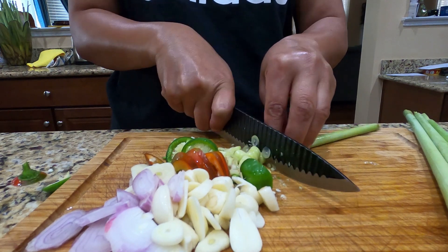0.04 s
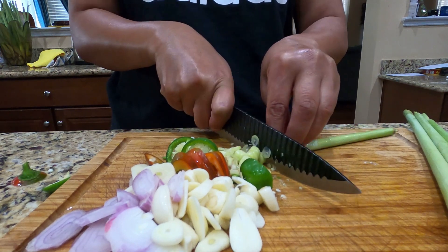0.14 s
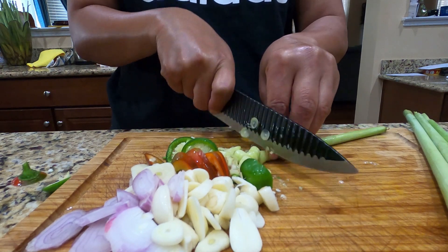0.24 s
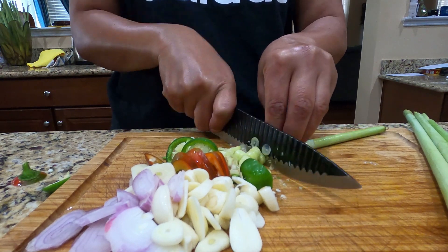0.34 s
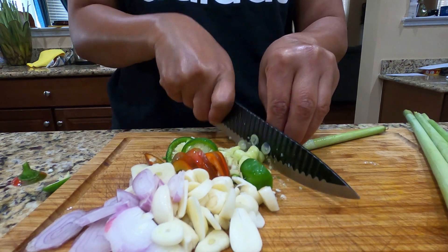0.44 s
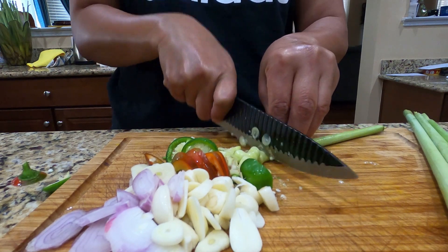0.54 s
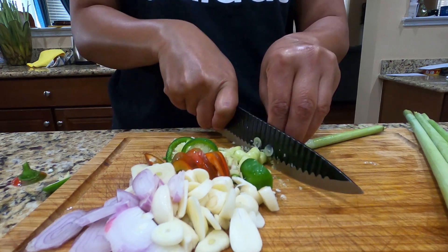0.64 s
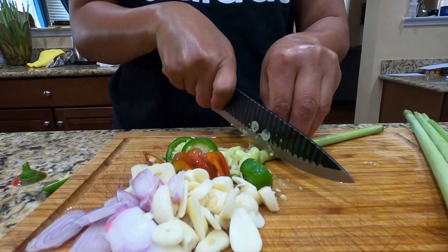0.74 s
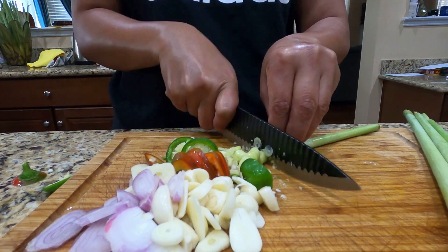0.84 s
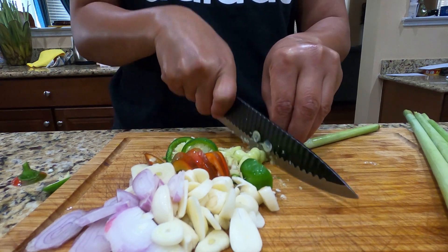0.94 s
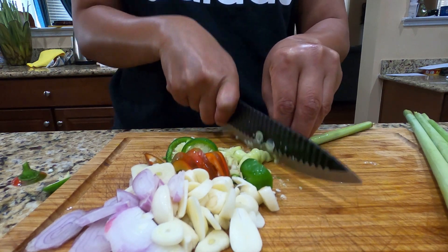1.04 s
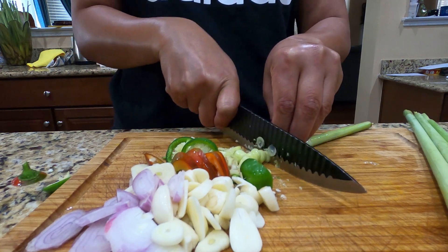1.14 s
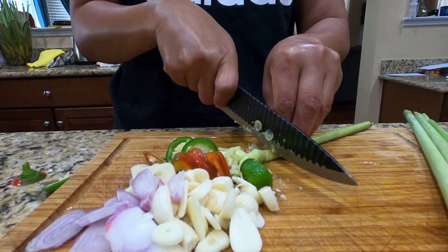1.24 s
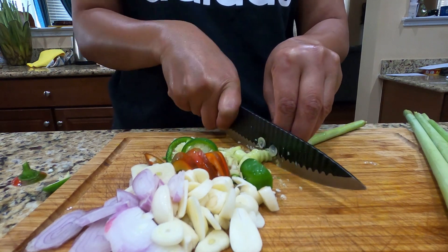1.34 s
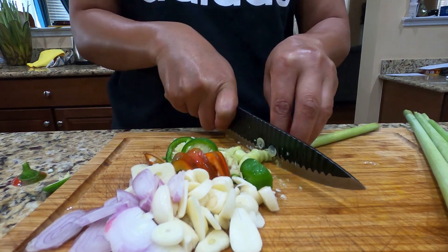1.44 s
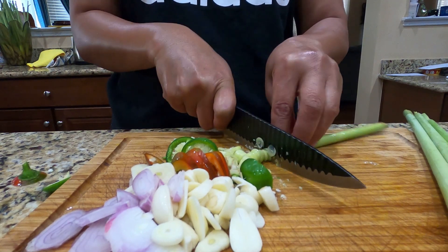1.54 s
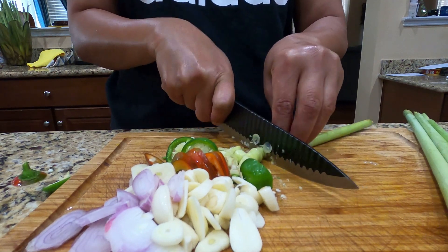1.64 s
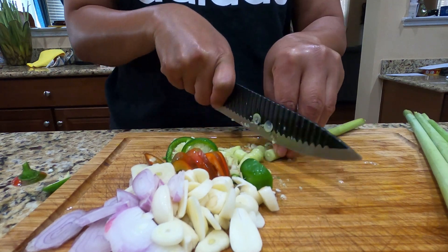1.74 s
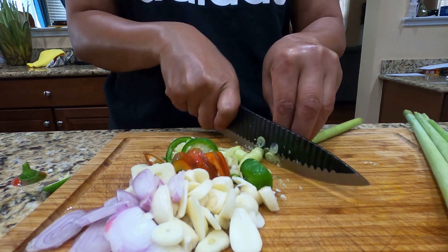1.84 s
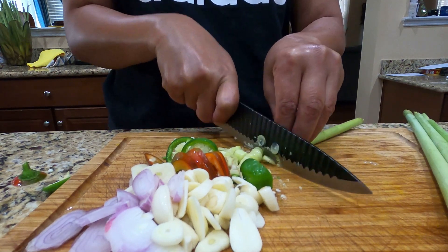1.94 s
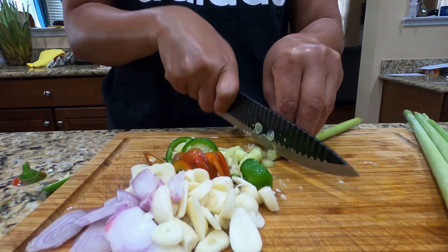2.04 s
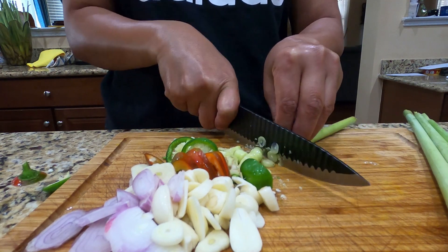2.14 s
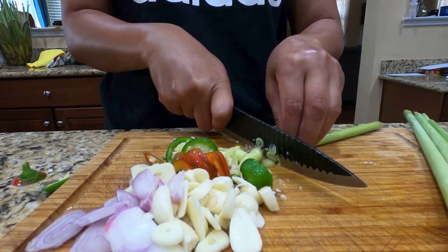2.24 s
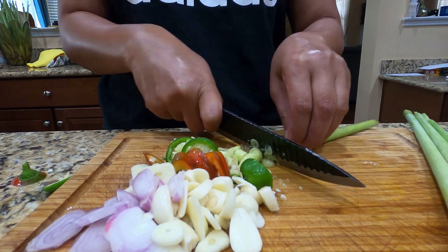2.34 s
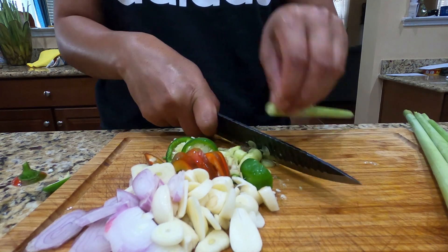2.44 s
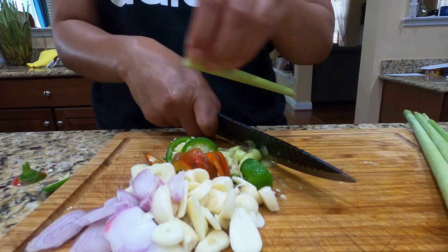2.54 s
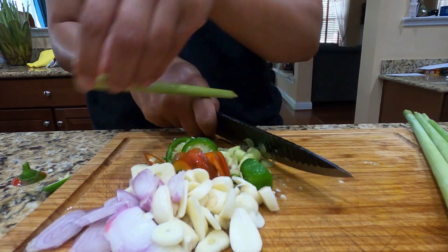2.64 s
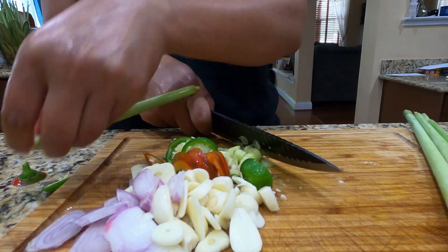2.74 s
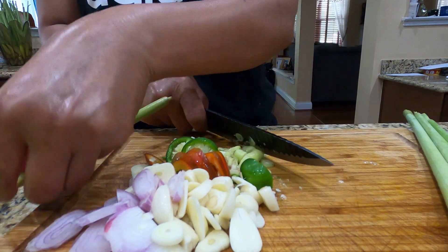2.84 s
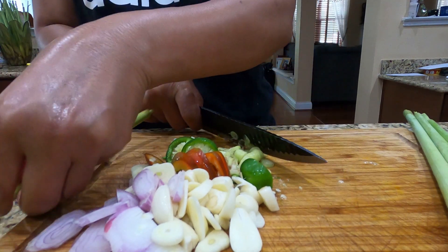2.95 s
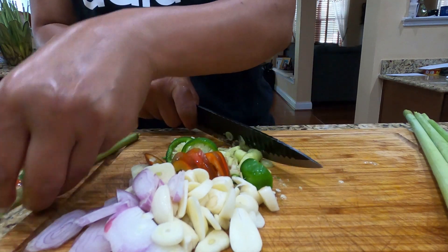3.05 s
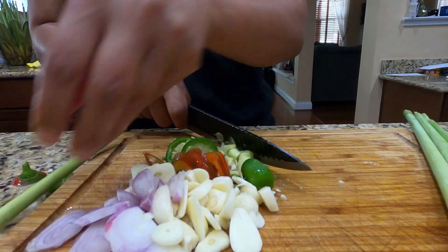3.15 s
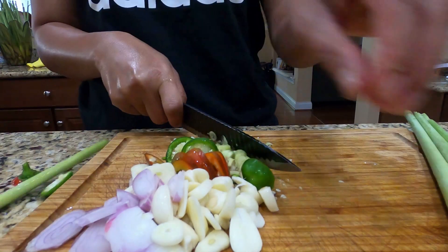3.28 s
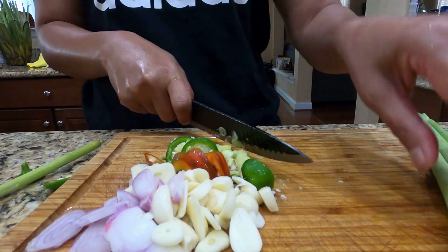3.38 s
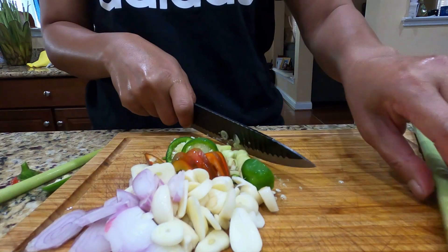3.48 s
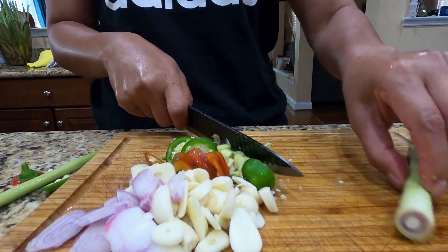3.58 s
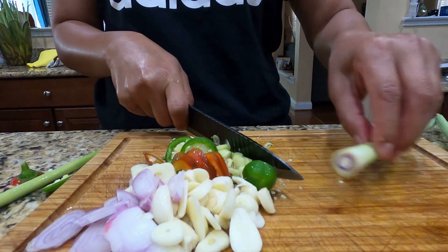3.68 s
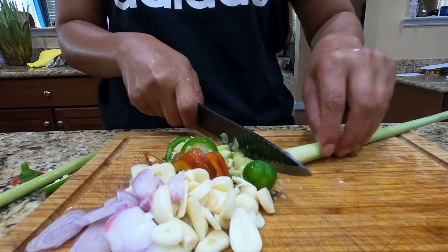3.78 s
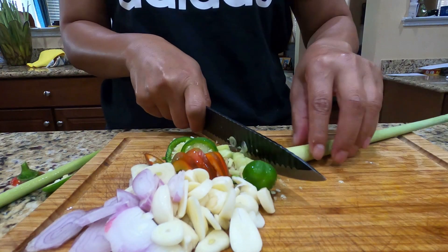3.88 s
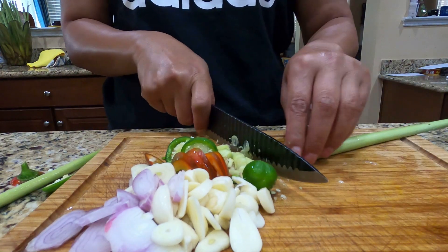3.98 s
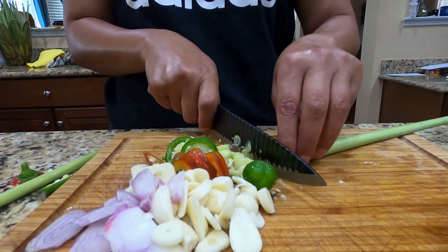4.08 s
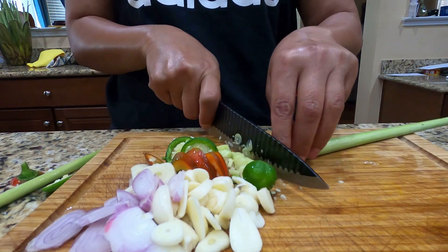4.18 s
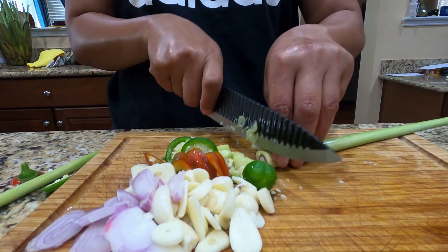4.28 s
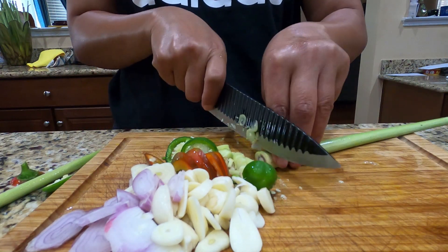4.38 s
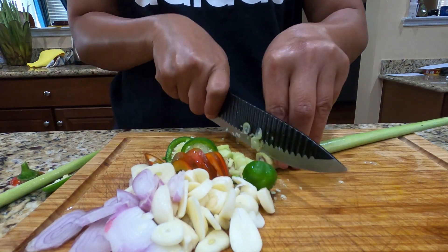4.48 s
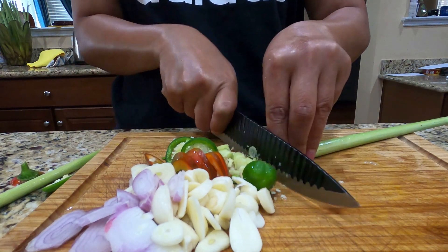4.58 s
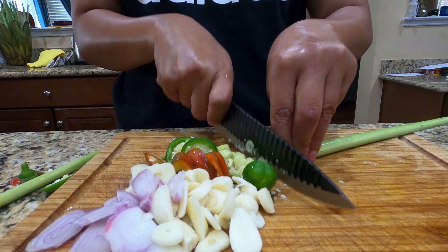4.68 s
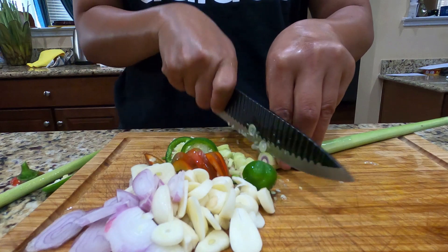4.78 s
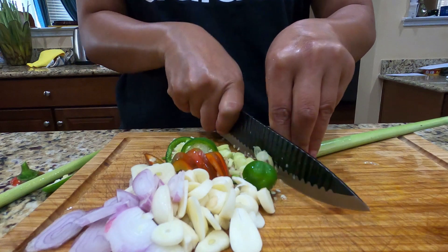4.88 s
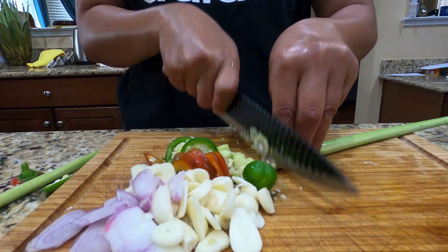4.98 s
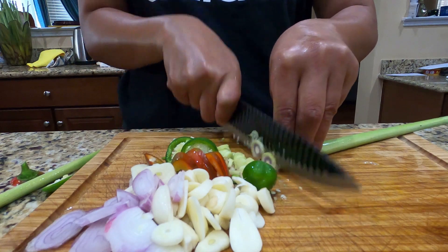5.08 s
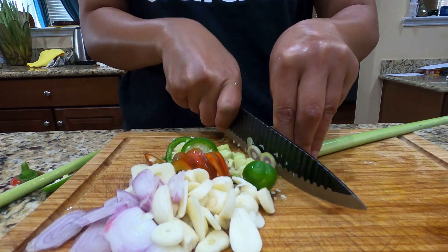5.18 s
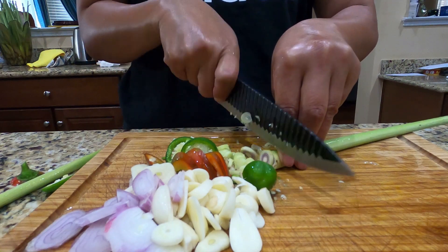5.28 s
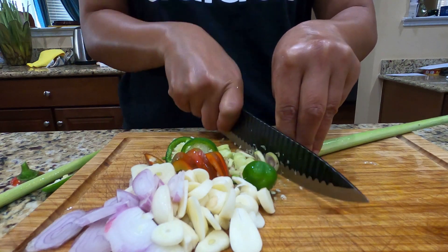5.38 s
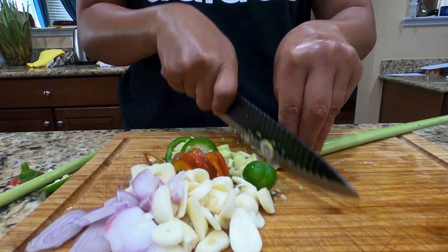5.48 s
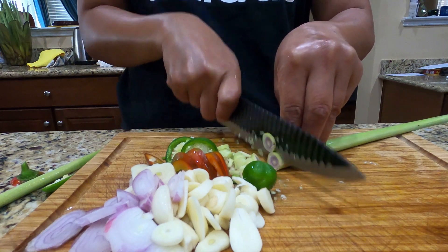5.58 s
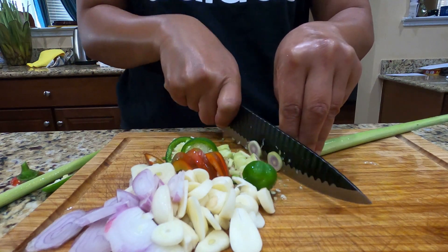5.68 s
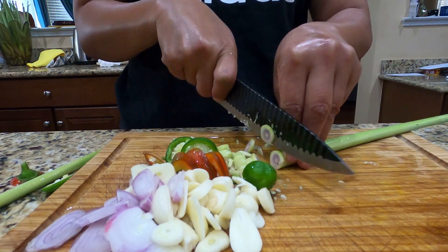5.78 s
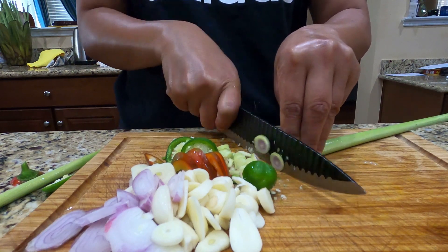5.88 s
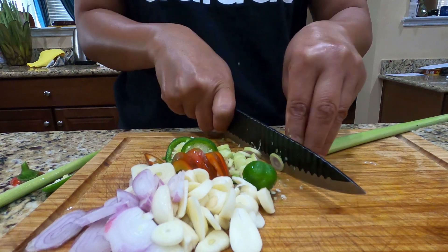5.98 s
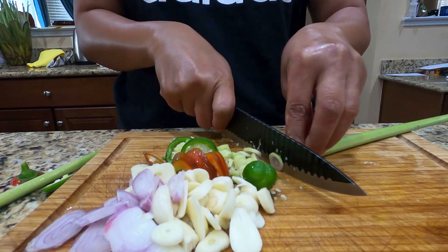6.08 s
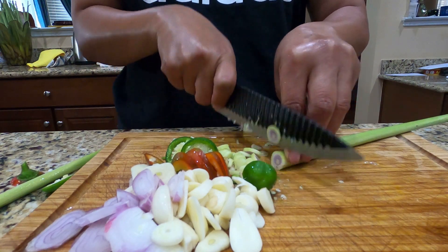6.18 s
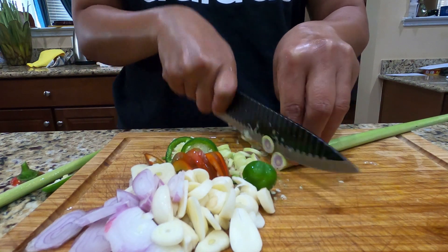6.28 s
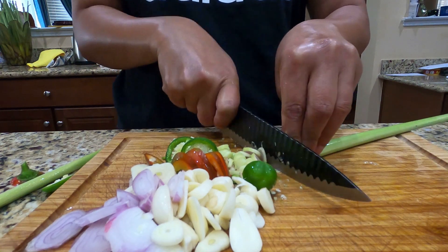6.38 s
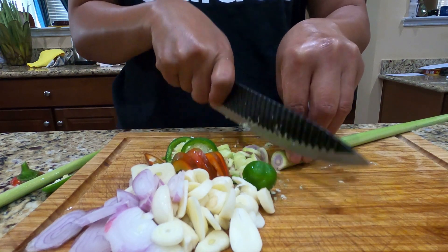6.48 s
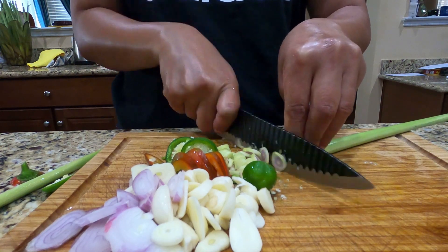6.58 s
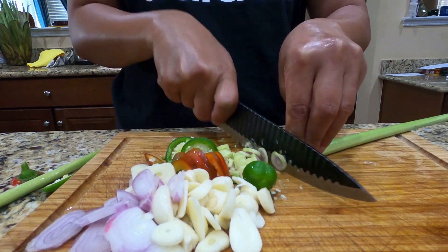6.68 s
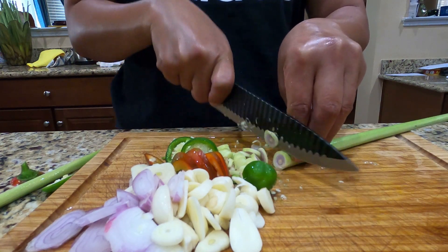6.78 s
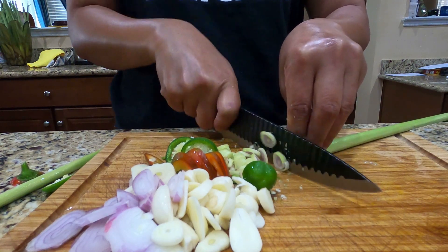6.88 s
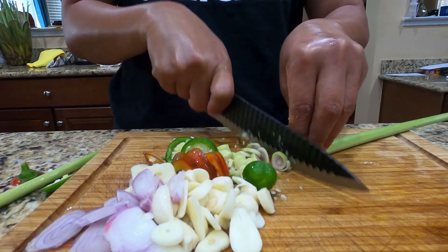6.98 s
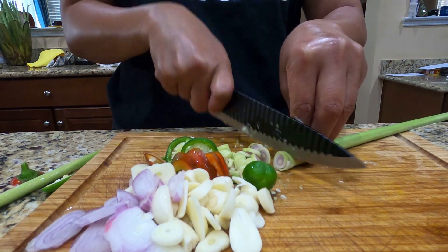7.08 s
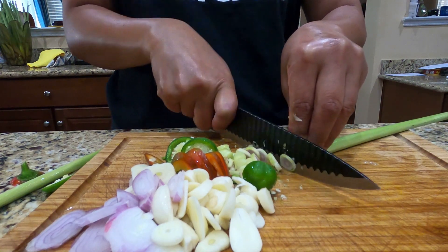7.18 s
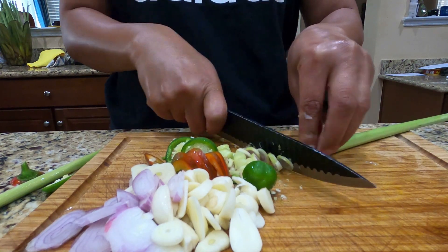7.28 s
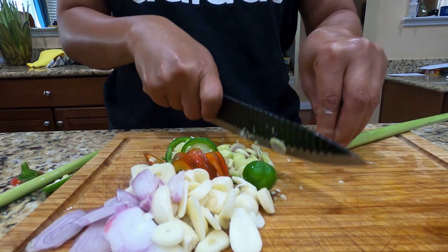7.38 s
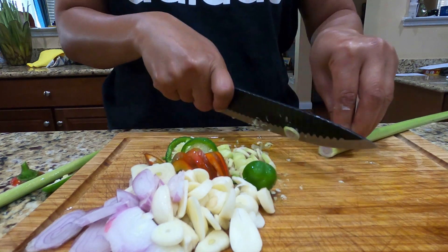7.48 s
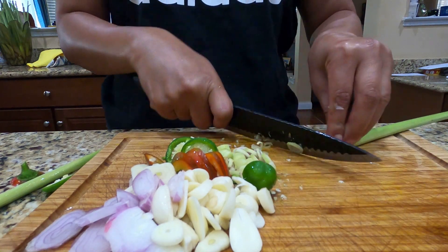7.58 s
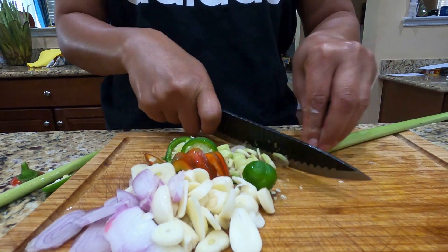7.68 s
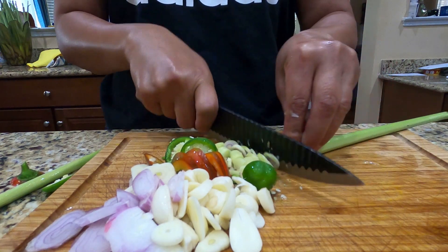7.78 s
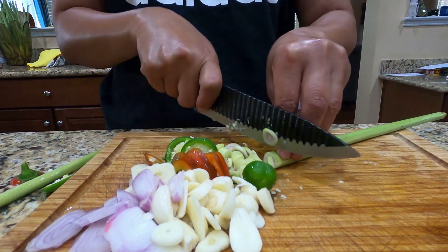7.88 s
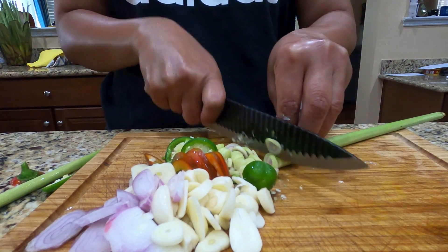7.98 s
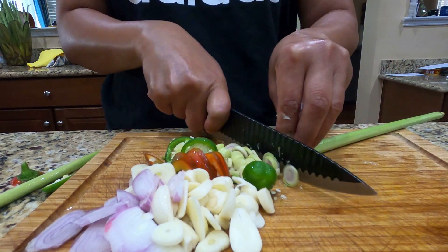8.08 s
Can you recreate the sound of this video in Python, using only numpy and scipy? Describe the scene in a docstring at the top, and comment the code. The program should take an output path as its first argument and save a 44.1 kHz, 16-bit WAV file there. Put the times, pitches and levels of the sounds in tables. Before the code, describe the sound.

A close stereo microphone hears a chef's knife slicing fibrous stalks on a wooden board in a reflective home kitchen, with faint room air and a low, slightly wavering motor hum throughout. From 0 to 2.3 s come eight cuts, about one every quarter second with one longer gap before 1.9: a skin tick, a short swelling crunch, then a dry woody knock. The one at 0.45 is far louder, with a bright blade clack. Between close cuts the lifting blade wipes softly. From 2.8 to 4.2 only handling: faint slides, light taps from 3.15 to 3.6, a duller thud near 4.0. At 4.7 the hardest chop cracks out, followed by regular cuts from 5.0 to 7.3, another loud clacking blow at 6.45. A firm tap at 7.7 and a brief edge scrape over wood at 7.75 lead to a last soft crunch and knock at 8.1.

```python
"""A chef's knife slices lemongrass on a wooden board on a stone counter, near the microphone in a live kitchen.
Each cut in turn: a tick of skin and a swelling crunch of fibres (filtered grains), then a knock (board modes).
Between close cuts the lifting blade wipes the cut face. Midway a new stalk is fetched: taps, slides, thuds.
Slicing resumes; before the last cut the edge drags over the wood (filtered grains). A motor hum (a sine)
and room air (filtered noise) last throughout; a limiter ducks after the hardest blows, which also clack."""
import sys
import numpy as np
from scipy import signal
from scipy.fft import rfft, irfft, next_fast_len
from scipy.io import wavfile
from scipy.ndimage import uniform_filter1d, minimum_filter1d

SR = 44100
rng = np.random.default_rng(int(sys.argv[2]) if len(sys.argv) > 2 else 0)


def master_out(mix):
    """Clip the mix to full scale and print it as 16-bit PCM to the path in sys.argv[1]."""
    frames = np.transpose(np.atleast_2d(mix))
    ceiling = np.clip(frames, -1, 1)
    pcm = np.round(ceiling * 32767).astype(np.int16)
    wavfile.write(sys.argv[1], SR, pcm)


N = 358533
TIME = np.arange(N) / SR

# Cuts: edge touches stalk t/s, edge reaches board t/s, skin pop level/dB, crunch level/dB, knock level/dB
CUT_EVENTS = [(0.013, 0.0729, -32, -24, -2), (0.44, 0.464, -16.5, -36, 9.5),
              (0.677, 0.728, -13, -23.5, -11), (0.92, 0.9646, -40, -23.5, -6.5),
              (1.157, 1.2146, -25, -21, -14), (1.425, 1.4707, -18.5, -20, -6.5),
              (1.9362, 1.9808, -19, -19.5, -11.5), (2.195, 2.2413, -29.5, -20, -10),
              (4.585, 4.689, -17.5, -23.5, 13.5), (4.923, 4.9921, -17, -22.5, -9),
              (5.194, 5.2547, -11.5, -22, -7.5), (5.451, 5.5006, -14, -22, -2),
              (5.689, 5.7536, -18.5, -22.5, -2.5), (5.957, 6.0147, -21, -23.5, -2.5),
              (6.42, 6.4593, -12.5, -24.5, 13), (6.676, 6.7299, -9, -24, -7.5),
              (6.932, 7.011, -20.5, -23, -13), (7.206, 7.265, -24.5, -24.5, -1.5),
              (8.09, 8.151, -17.5, -25.5, -14)]
# Stalks and blade set down on the board: t/s, peak level/dB, lowest f/Hz, highest f/Hz
SET_DOWN_TAPS = [(3.1601, -19.5, 1570, 2940), (3.362, -29, 950, 1970), (3.4504, -26, 690, 10800),
                 (3.571, -37.5, 60, 7300), (3.951, -40.5, 60, 1090), (3.9841, -17, 40, 1600),
                 (4.167, -52, 100, 3670), (4.56, -44, 100, 3600), (4.598, -24, 60, 1030),
                 (7.6957, -11.5, 102, 1420)]
# Modes of the board: f/Hz, relative level/dB, decay time T60/s
BOARD_MODES = [(56.9, -25.5, 0.17), (71, -26.5, 0.1), (127.4, -23.5, 0.1), (187, -30, 0.092),
               (218.6, -39, 0.27), (264, -35.5, 0.17), (450, -43, 0.3), (610, -36.5, .09),
               (800, -29.5, 0.13), (942, -35, 0.018), (1121.5, -15, 0.055), (1180, -28, 0.26),
               (1268, -30, 0.4), (1422, -32.5, 0.1), (1692, -14, 0.015), (1870, -26, 0.0064),
               (2520, -16.5, 0.0033)]
# Spectrum of the crack of a knock: f/Hz, relative level/dB
KNOCK_SPECTRUM = [(60, -14.5), (230, -16.5), (370, -13.5), (540, -7.5), (1050, -3), (1400, -0.5),
                  (2600, -5.5), (3400, -5), (5000, -14), (9000, -21), (16000, -33.5)]
# The blade's clack when it strikes the board hard: f/Hz, relative level/dB, decay time T60/s
CLACK_MODES = [(2430, -13.5, 0.024), (2793, -1, 0.014)]
# Thud of a stalk's thick end when set down: f/Hz, relative level/dB, decay time T60/s
THUD_MODES = [(293, -18.5, 0.039), (462, -13, 0.043), (574, -8, 0.084), (740, -8, 0.028), (944, -16, 0.053)]
# Modes of the blade, damped by the hand: f/Hz, relative level/dB, decay time T60/s
BLADE_MODES = [(3180, -41.5, 0.006), (3980, -34.5, 0.016), (4987, -48, 0.011), (9700, -54.5, 0.027)]
# Spectrum of the popping skin: f/Hz, relative level/dB
SKIN_SPECTRUM = [(60, 9.5), (150, 3), (330, -14), (700, -7), (1200, 2), (1800, 1), (2400, -13),
                 (3900, -6.5), (6500, -21), (10000, -21), (16000, -46.5)]
# Spectrum of the crunching fibres: f/Hz, relative level/dB
FIBRE_SPECTRUM = [(40, -8), (150, -5.5), (330, -25), (600, -9), (1100, -3), (1700, -2.5), (2450, -12.5),
                  (3000, -7.5), (3900, -6.5), (5200, -11.5), (6600, -22), (9700, -18), (13000, -27.5),
                  (16000, -42)]
# Spectrum of the blade wiping the cut face: f/Hz, relative level/dB
WIPE_SPECTRUM = [(200, -37), (900, -13), (2000, 2), (3300, 0), (5200, -9.5), (7000, -17), (10000, -17),
                 (16000, -35)]
# Hand moves that slide a stalk and lean on the board, plus the blade's last brief wipe at 7.45 s: start t/s,
# length t/s, slide level/dB, lean level/dB
HAND_MOVES = [(2.79, 0.28, -77, -93), (3.173, 0.15, -52, -59), (3.459, 0.0045, -53, -66),
              (3.568, 0.074, -52.5, -50), (3.646, 0.043, -45, -66), (3.762, 0.26, -64.5, -53),
              (4.13, 0.026, -61.5, -55.5), (4.21, 0.055, -75.5, -53), (4.333, 0.047, -56, -60),
              (4.583, 0.042, -45.5, -32.5), (7.452, 0.0039, -49.5, -65)]
# Spectrum of sliding stalks: f/Hz, relative level/dB
SLIDE_SPECTRUM = [(180, -55), (300, 0.5), (392, -3), (634, -6), (801, -9.5), (1100, -11), (2400, -7),
                  (3640, -7.5), (4590, -13), (5610, -18), (12100, -27), (16000, -58)]
# Hollow ring of the stalks: f/Hz, relative level/dB, decay time T60/s
STALK_MODES = [(574, -43, 0.067), (2350, -59, 0.018), (3820, -40, 0.024), (5690, -31.5, .03),
               (8620, -39, .04)]
# Spectrum of the edge dragged over wood: f/Hz, relative level/dB
SCRAPE_SPECTRUM = [(150, -22), (250, -16), (390, 0.5), (651, -15), (788, -0.5), (860, -8), (1700, -7),
                   (1980, -10.5), (3060, -3.5), (4730, -13.5), (6360, -28), (10400, -25.5), (13900, -48),
                   (16000, -76)]
# Right port against left: f/Hz, level difference/dB
PORT_TILT = [(60, 0), (130, -1.5), (400, 1.1), (800, 2.8), (1300, 4), (2400, -1.5), (4400, 3), (8000, 6),
             (15000, 10)]
# Scatter from things near the board: f/Hz, level/dB
CLUTTER_SPECTRUM = [(100, -16.5), (500, -11.5), (1500, -12), (4000, -3.5), (8000, -1.5), (15000, -2)]
# Reverberation of the kitchen: f/Hz, level/dB
ROOM_SPECTRUM = [(50, -16), (220, 0.5), (330, -8.5), (480, -7.5), (1300, -7), (2000, -5.5), (2700, -12),
                 (3800, -15.5), (7000, -10.5), (15000, -17.5)]
# Reverberation time of the kitchen: f/Hz, T60/s
ROOM_DECAY = [(60, 0.38), (250, 0.56), (700, 0.67), (1600, 0.58), (3500, 0.62), (7000, 0.53), (15000, 0.3)]
# Spectrum of the room air: f/Hz, relative level/dB
AIR_SPECTRUM = [(25, 0.5), (55, 3.5), (100, -5.5), (180, 12.5), (300, -6), (600, -15), (1200, -25),
                (3000, -24.5), (8000, -33.5), (12000, -36.5), (16000, -52.5)]

CONTACT_HZ, DOUBLING_DB = 2360, 18  # cutoff of a 0 dB knock; a blow this much harder is twice as bright
SWELL_SHARE = 0.44  # width of the crunch's swell as a share of the cut: a slow cut crunches longer
# the wipe leads the next cut; lead and width are shares of the pause between the cuts
WIPE_LEAD_SHARE, WIPE_WIDTH_SHARE = 0.27, 0.065
WIPE_DB, USUAL_PAUSE_S, SLOW_LIFT_DB = -46.5, .2, -5  # level at a usual pause; change per doubled pause
REST_S = .6  # in a longer pause the knife rests
MOVE_ATTACK_S, MOVE_RELEASE_S = 0.033, 0.031  # rise before the start; fade to 1/e
# the edge is dragged sideways over the wood once: it bites, holds, then eases off
DRAG_S, DRAG_LENGTH_S, DRAG_DB = 7.752, 0.031, -30.5
DRAG_ATTACK_S, DRAG_RELEASE_S = 0.034, 0.071  # rise before the start; fade to 1/e
HUM_HZ, HUM_DB, AIR_DB = 178.7, -51, -56.5
TOP_HZ = 16000  # upper limit of the final sound


def blows(thud_below_hz=80, thud_db=1.5):
    """Impact: the edge meets the board after each cut, brighter the harder it hits; things are set down."""
    out = np.zeros(N)
    for _, board_s, _, _, db in CUT_EVENTS:
        contact_hz = CONTACT_HZ * 2 ** (db / DOUBLING_DB)
        add(out, board_s, undb(db) * knock(low_hz=33.95, high_hz=contact_hz, ring_db=-7.5))
    for tap_s, db, low_hz, high_hz in SET_DOWN_TAPS:
        add(out, tap_s, undb(db) * knock(low_hz, high_hz, ring_db=-5.5, rough=0.076))
        if low_hz < thud_below_hz:  # a heavy contact
            add(out, tap_s, undb(db + thud_db) * ring(THUD_MODES, detune=0.057))
    return out


def knock(low_hz, high_hz, ring_db, rough=0.029, settle_s=0.0022, spread_hz=1400, crest_db=7):
    """Modal excitation, peak near 1: a soft contact cannot reach the high modes, a light one not the low."""
    t = TIME[:256]
    # the edge settles unevenly after its first touch
    settling = rough * rng.standard_normal(len(t)) * np.exp(-t / settle_s)
    contact = signal.unit_impulse(len(t)) + settling
    board = undb(ring_db) * ring(BOARD_MODES, detune=0.0096)
    crack = body(KNOCK_SPECTRUM, size=1024)
    add(board, 0, crack / np.abs(crack).max())
    soft = signal.butter(2, min(high_hz, SR / 3), fs=SR, output="sos")
    light = signal.butter(2, low_hz, "high", fs=SR, output="sos")
    pole = np.exp(-2 * np.pi * spread_hz / SR)
    bending = [-pole, 1, 0, 1, -pole, 0]  # all-pass: in a plate the highs travel faster than the lows
    sound = signal.sosfilt(np.vstack([soft, light, bending]), through(board, contact))
    return sound / np.std(sound[:len(t) // 2]) / undb(crest_db)


def clacks(from_db=3, clack_db=2.0, late_s=.0003):
    """Impact threshold: only the hardest blows make the blade itself clack."""
    out = np.zeros(N)
    for _, board_s, _, _, db in CUT_EVENTS:
        if db > from_db:
            add(out, board_s + late_s, undb(db + clack_db) * ring(CLACK_MODES, detune=0.0093))
    return out


def cutting(skin_s=0.0022, release_s=0.0022, lead_s=0.005, drag_db=-20, push_db=-13, uneven_db=2.0):
    """Fracture: the skin pops, then fibres snap ever louder as the blade speeds up, until it is through."""
    pop, force, push = np.zeros(N), np.zeros(N), np.zeros(N)
    t = TIME[:SR // 5]
    low_modes = [mode for mode in BOARD_MODES if mode[0] < 200]
    for touch_s, board_s, pop_db, crunch_db, _ in CUT_EVENTS:
        cut_s = board_s - touch_s
        left = cut_s - t  # time until the board is reached
        swell = np.exp(-np.abs((left - lead_s) / (SWELL_SHARE * cut_s)) ** 1.74)
        release = np.exp(np.minimum(left - .001, 0) / release_s)
        add(force, touch_s, undb(crunch_db) * np.maximum(swell, undb(drag_db)) * release)
        add(pop, touch_s, undb(pop_db) * np.minimum(t / 0.0011, 1) * np.exp(-t / skin_s))
        # the stalk passes the first push on to the board's lowest modes
        push_ring = ring(low_modes, detune=.02, size=len(t))
        add(push, touch_s, undb(push_db) * np.minimum(t / .004, 1) * push_ring)
    layers = unit(undb(uneven_db * wander(count=2200)))  # the rolled leaves give way one after another
    snapping = force * layers * grains(rate=9000, spread_db=2.2, hiss=0.38)
    popping = pop * grains(rate=10000, spread_db=0.6, hiss=0.88)
    sound = through(snapping, body(FIBRE_SPECTRUM)) + through(popping, body(SKIN_SPECTRUM))
    return sound + through(sound, ring(BLADE_MODES, detune=0, size=2048)) + push


def rubbing(catch_db=4.5):
    """Friction: the lifting blade, sliding stalks, the dragged edge and hands on the board."""
    slide, lean = np.zeros(N), np.zeros(N)
    for start_s, length_s, slide_db, lean_db in HAND_MOVES:
        move = stroke(start_s, length_s, MOVE_ATTACK_S, MOVE_RELEASE_S)
        slide += undb(slide_db) * move
        lean += undb(lean_db) * move
    drag = undb(DRAG_DB) * stroke(DRAG_S, DRAG_LENGTH_S, DRAG_ATTACK_S, DRAG_RELEASE_S)
    catching = unit(undb(catch_db * wander(count=600)))  # damp surfaces catch and slip
    wipes = through(lifts() * catching * grains(rate=3000, spread_db=2.5, hiss=0.3), body(WIPE_SPECTRUM))
    stalks = through(slide * catching * grains(rate=500, spread_db=4.0, hiss=1.0), body(SLIDE_SPECTRUM))
    stalks = stalks + through(stalks, ring(STALK_MODES, detune=0, size=2048))
    edge = through(drag * grains(rate=2900, spread_db=2.5, hiss=0.58), body(SCRAPE_SPECTRUM))
    lower_modes = [mode for mode in BOARD_MODES if mode[0] < 700]
    hands = lean * unit(through(rng.standard_normal(N), ring(lower_modes, detune=0)))
    return wipes + stalks + edge + hands


def lifts(slip_share=.19, slip_width_s=0.002, slip_db=4):
    """Friction and slip: gain of the blade wiping up the cut face, then ticking off it; slow lifts are softer."""
    out = np.zeros(N)
    for (_, board_s, *_), (touch_s, *_) in zip(CUT_EVENTS, CUT_EVENTS[1:]):
        pause = touch_s - board_s
        if pause < REST_S:
            wipe = np.exp(-((TIME - touch_s + WIPE_LEAD_SHARE * pause) / (WIPE_WIDTH_SHARE * pause)) ** 2)
            slip = np.exp(-((TIME - touch_s + slip_share * pause) / slip_width_s) ** 2)
            lift_db = WIPE_DB + SLOW_LIFT_DB * np.log2(pause / USUAL_PAUSE_S)
            out += undb(lift_db) * (wipe + undb(slip_db) * slip)
    return out


def stroke(start_s, length_s, attack_s, release_s):
    """Envelope of one movement: attack up to its start, hold for its length, release."""
    rise = np.clip((TIME - start_s) / attack_s + 1, 0, 1) ** 2
    return rise * np.exp(-(np.maximum(TIME - start_s - length_s, 0) / release_s) ** 2)


def flutter(x, trip_s=.01062, first=0.16, loss=0.31, count=4):
    """Flutter echo: sound bounces between counter and ceiling, weaker on each trip."""
    out = x.copy()
    echo = signal.sosfilt(signal.butter(2, [500, 2800], "band", fs=SR, output="sos"), x)
    for k in range(count):
        add(out, (k + 1) * trip_s, first * loss ** k * echo)
    return out


def ports(x, lag_s=.00004):
    """Interaural-style cues: the right port hears the board a little earlier and mostly brighter than the left."""
    size = next_fast_len(N, True)
    hz = np.fft.rfftfreq(size, 1 / SR)
    tilt_db = along(PORT_TILT, hz) / 2
    left = undb(-tilt_db) * np.exp(-2j * np.pi * hz * lag_s)
    right = undb(tilt_db)
    return irfft(rfft(x, size) * np.array([left, right]), size)[:, :N]


def clutter(x, fade_s=0.00064, turn_rad=1.1, size=512):
    """Scattering: hands and heaped vegetables spread the first milliseconds; it shifts as the hands move."""
    t = TIME[:size]
    shape = t * np.exp(-t / fade_s)
    pose = turn_rad * wander(count=36)
    out = 0
    for weight in np.cos(pose), np.sin(pose):  # blend of two scatter patterns
        hz, noise = diffuse(size, apart_hz=402)
        response = irfft(noise * undb(along(CLUTTER_SPECTRUM, hz)), size) * shape / np.linalg.norm(shape)
        out = out + np.array([through(weight * x, side) for side in response])
    return out


def kitchen(x, build_s=0.0063, size=40000):
    """Reverberation: hard walls and cupboards give a diffuse tail whose octaves die at their own rates."""
    t = TIME[:size]
    hz, noise = diffuse(size)
    octave = np.log2(np.clip(hz, 62.5, 16000) / 62.5)
    tail = 0
    for k in np.arange(int(octave.max()) + 1):
        rate = np.log(1000) / along(ROOM_DECAY, 62.5 * 2 ** k)
        share = np.maximum(1 - np.abs(octave - k), 0)  # neighbouring octaves cross-fade
        band = irfft(noise * undb(along(ROOM_SPECTRUM, hz)) * share, size)
        tail = tail + band * np.exp(-rate * t) * np.sqrt(2 * rate / SR)
    build = np.minimum(t / build_s, 1) ** 2
    return np.array([through(x, side) for side in tail * build])


def appliance(waver_db=2.1):
    """Steady tone over diffuse noise: a motor's single, slightly wavering hum and faint room air."""
    size = next_fast_len(N, True)
    hz, noise = diffuse(size)
    air = unit(irfft(noise * undb(along(AIR_SPECTRUM, hz)), size)[:, :N])
    hum_gain = undb(HUM_DB + waver_db * wander(count=40))
    hum = np.sqrt(2) * np.sin(2 * np.pi * HUM_HZ * TIME) * hum_gain
    return undb(AIR_DB) * air + np.outer(undb([.8, -.8]), hum)  # hum a little louder at the left


def diffuse(size, apart_hz=3600):
    """Diffuse-field coherence: spectrum of noise alike at both ports in the bass, unrelated in the treble."""
    hz = np.fft.rfftfreq(size, 1 / SR)
    likeness = np.clip(0.71 / (1 + (hz / apart_hz) ** 3), 0, 1)
    mid, side = rfft(rng.standard_normal((2, size)))
    mid = mid * np.sqrt((1 + likeness) / 2)
    side = side * np.sqrt((1 - likeness) / 2)
    return hz, np.array([mid + side, mid - side])


def ring(modes, detune, size=10000):
    """Modal decay: a sum of damped sines, shifting a little with the place of the blow if detuned."""
    out = np.zeros(size)
    for hz, db, t60 in modes:
        t = TIME[:min(size, int(t60 * SR))]
        mode_hz = hz * (1 + detune * rng.standard_normal())
        decay = np.exp(-np.log(1000) * t / t60)
        add(out, 0, undb(db) * np.sin(2 * np.pi * mode_hz * t) * decay)
    return out


def grains(rate, spread_db, hiss):
    """Granular noise: tiny snaps of uneven size (rate per second) over smooth friction; rms 1."""
    hit = rng.random(N) < rate / SR
    sizes = np.minimum(rng.standard_exponential(N), 4)
    signs = np.sign(rng.random(N) - .5)
    snaps = np.where(hit, undb(spread_db * sizes) * signs, 0)
    return unit(unit(snaps) + hiss * rng.standard_normal(N))


def body(points, size=4096):
    """Minimum phase: causal response of unit energy with the given spectrum, by way of the cepstrum."""
    cepstrum = irfft(np.log(undb(along(points, np.fft.rfftfreq(size, 1 / SR)))))
    cepstrum[1:size // 2] *= 2  # fold the negative times onto the positive
    cepstrum[size // 2 + 1:] = 0
    response = irfft(np.exp(rfft(cepstrum)))
    return response / np.linalg.norm(response)


def wander(count):
    """Slow random modulation: straight lines between evenly spaced random points; rms 1."""
    return unit(np.interp(TIME, np.linspace(0, TIME[-1], count), rng.standard_normal(count)))


def through(x, response):
    """Linear filtering: convolution that keeps the length."""
    return signal.oaconvolve(x, response)[:len(x)]


def add(track, s, sound):
    """Superposition: mix a sound in at a time."""
    i = int(np.clip(round(s * SR), 0, N))
    track[i:i + len(sound)] += sound[:N - i]


def along(points, hz):
    """Interpolation of a table on a log-frequency axis."""
    f, value = np.transpose(points)
    return np.interp(np.log(np.maximum(hz, 1)), np.log(f), value)


def unit(x):
    """Normalisation to rms 1."""
    return x / np.sqrt(np.mean(x ** 2))


def undb(db):
    """Logarithmic level: decibels to amplitude gain."""
    return 10 ** (np.asarray(db) / 20)


def scene(clack_room_db=-11):
    """Direct sound, scatter and reverberation; the blade's flat faces the microphone, so less clack fills the room."""
    work, clack = blows() + cutting() + rubbing(), clacks()
    near = work + clack
    room = kitchen(work + undb(clack_room_db) * clack)
    return ports(flutter(near)) + clutter(near) + room + appliance()


def record(dry, ceiling_db=0.02, release_db_per_s=68, low_cut_hz=42):
    """Peak limiting: the deepest bass is cut, peaks are ducked fast and recover slowly, the top is cut."""
    dry = signal.sosfilt(signal.butter(3, low_cut_hz, "high", fs=SR, output="sos"), dry)
    peak = -minimum_filter1d(-np.abs(dry).max(axis=0), size=24)
    over_db = np.maximum(20 * np.log10(peak + np.finfo(float).tiny) - ceiling_db, 0)
    recovery_db = release_db_per_s * TIME
    held_db = np.maximum.accumulate(over_db + recovery_db) - recovery_db
    duck_db = uniform_filter1d(held_db, size=12)
    top_cut = signal.ellip(10, .2, 90, TOP_HZ, fs=SR, output="sos")
    return signal.sosfilt(top_cut, dry * undb(-duck_db))


dry = scene()
out = record(dry)
master_out(out)
```